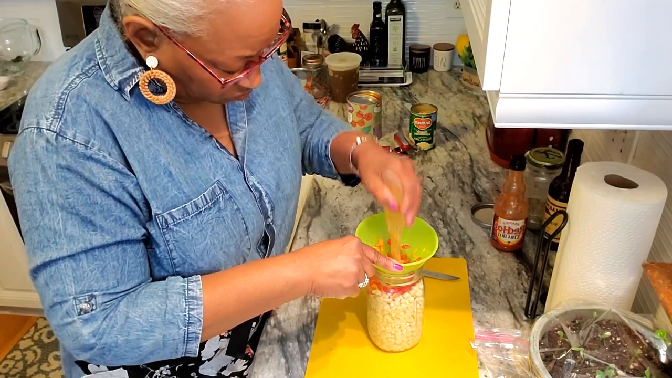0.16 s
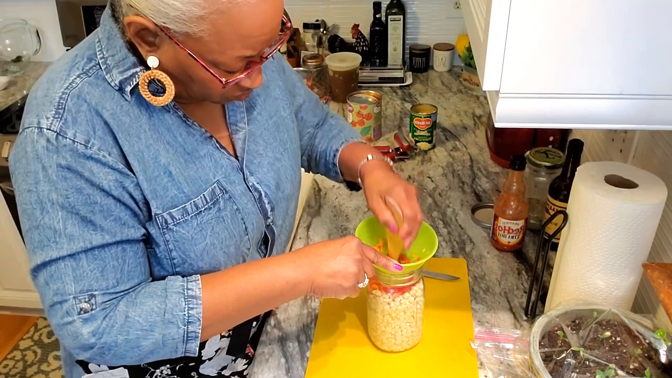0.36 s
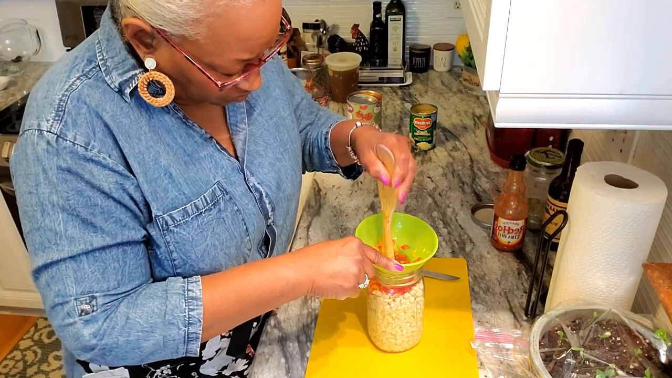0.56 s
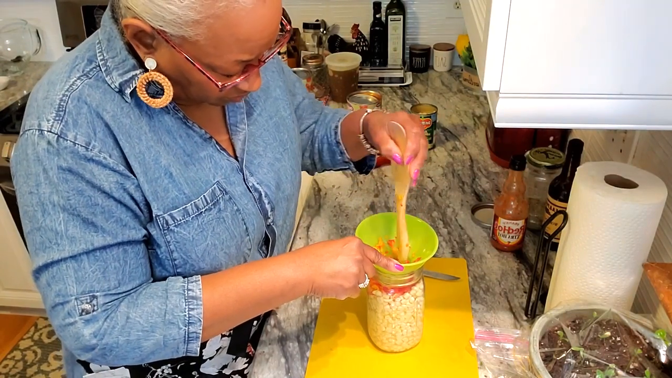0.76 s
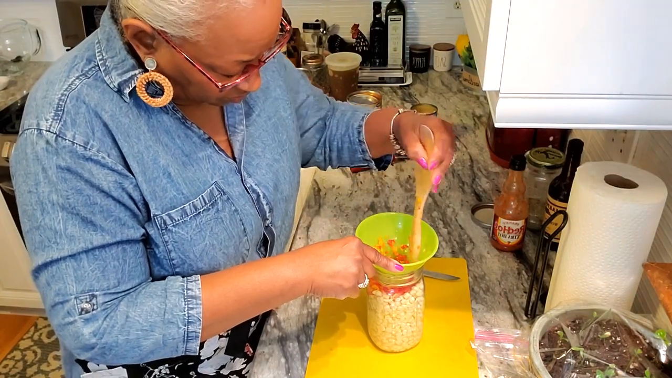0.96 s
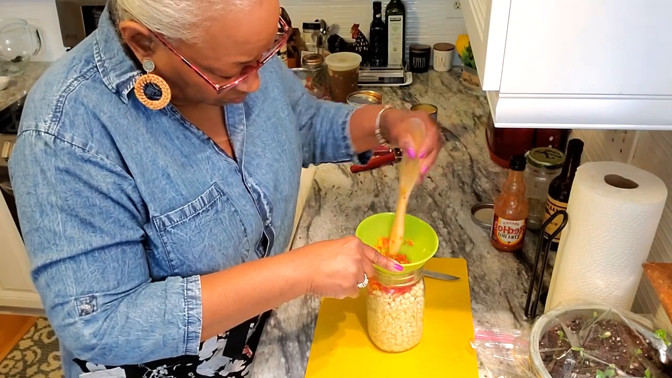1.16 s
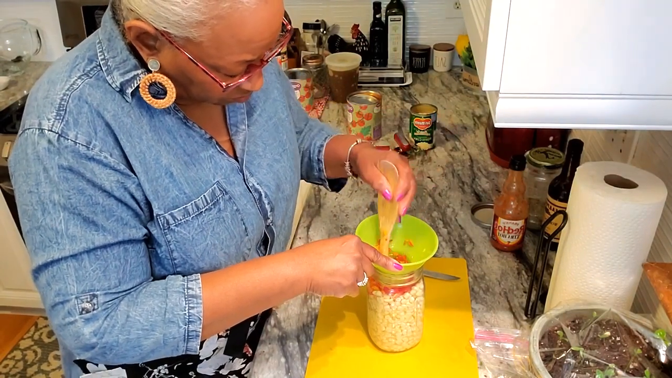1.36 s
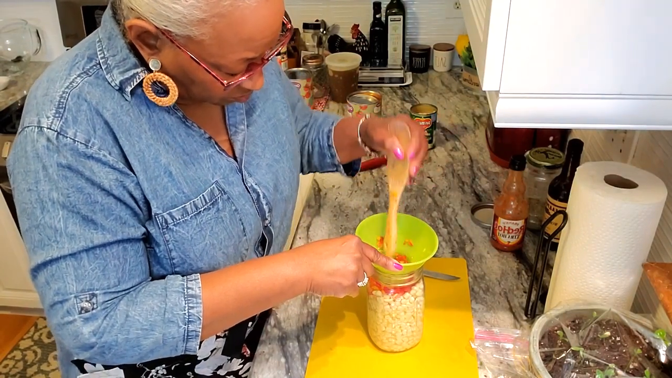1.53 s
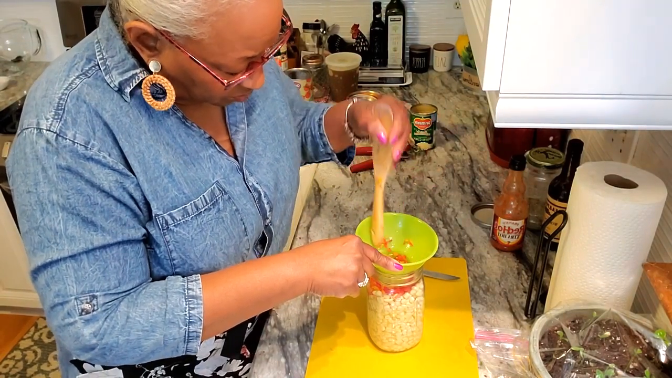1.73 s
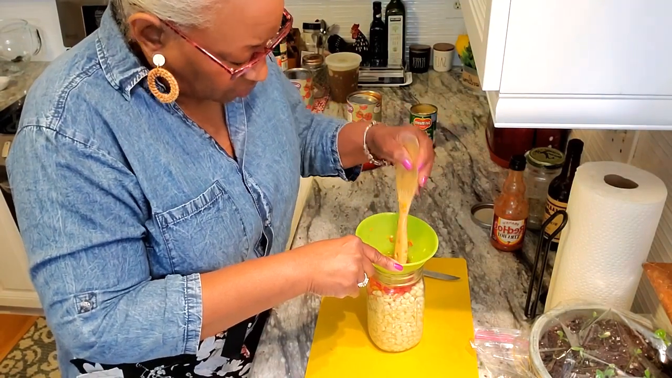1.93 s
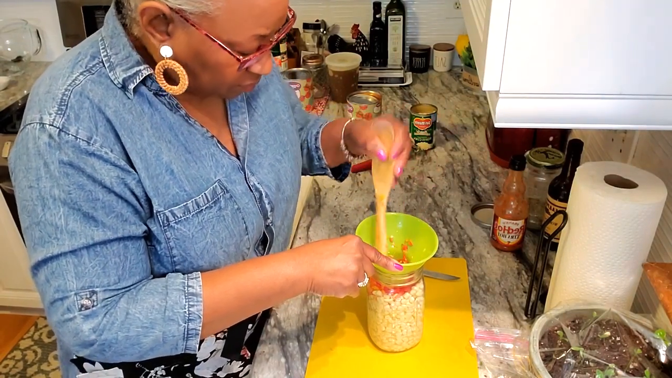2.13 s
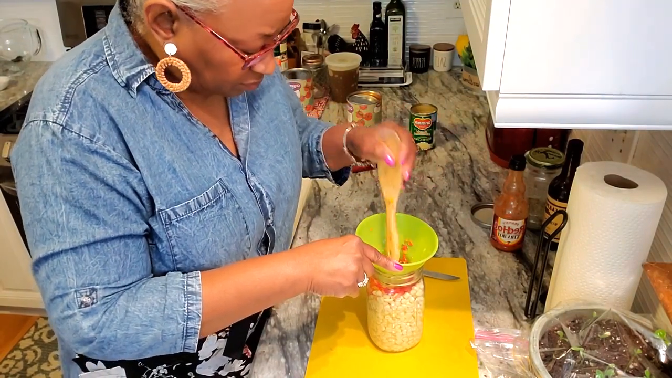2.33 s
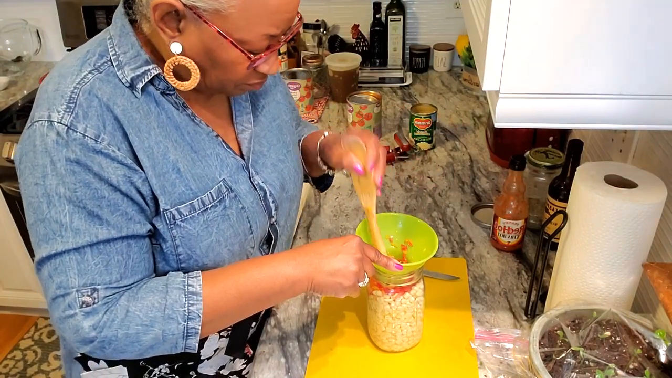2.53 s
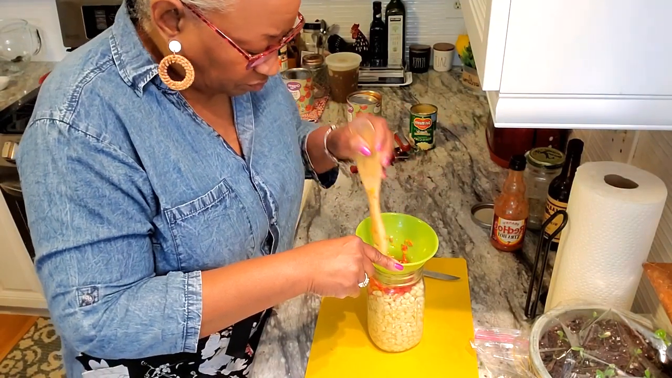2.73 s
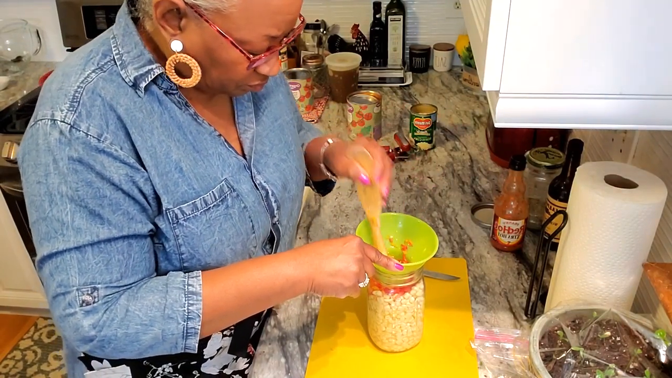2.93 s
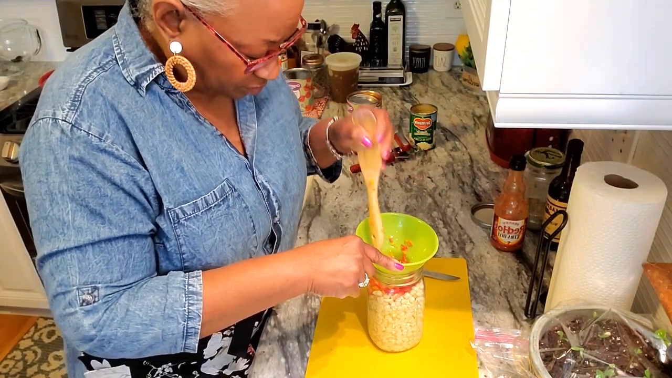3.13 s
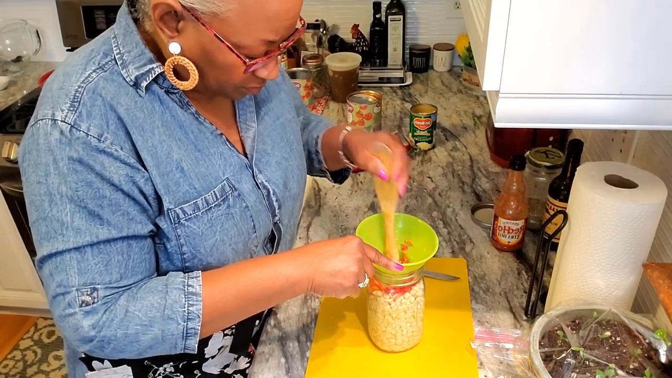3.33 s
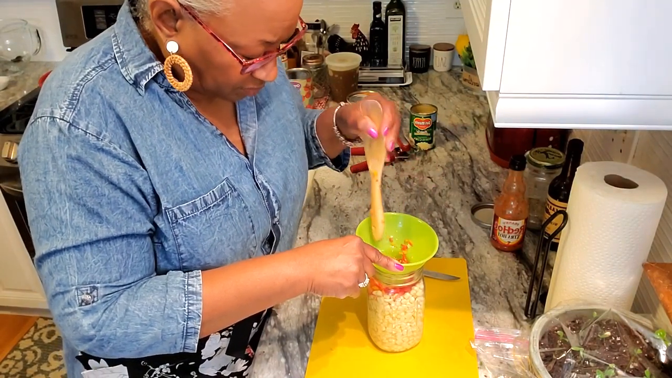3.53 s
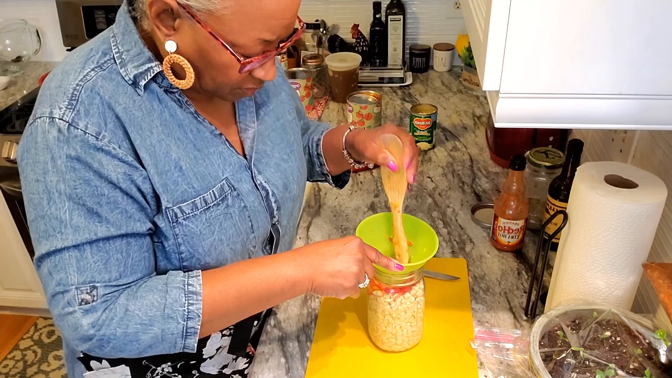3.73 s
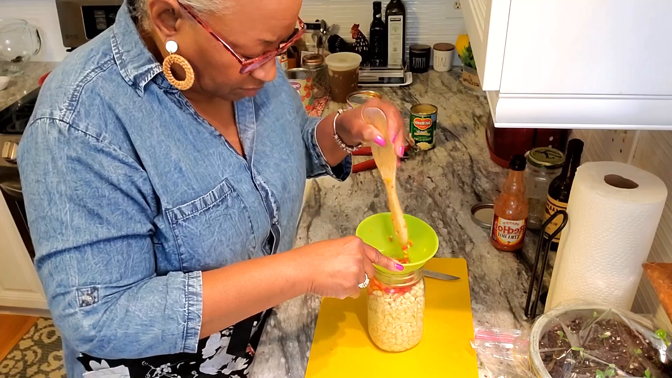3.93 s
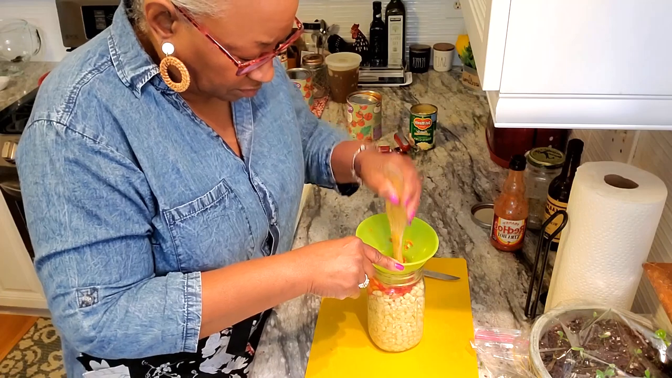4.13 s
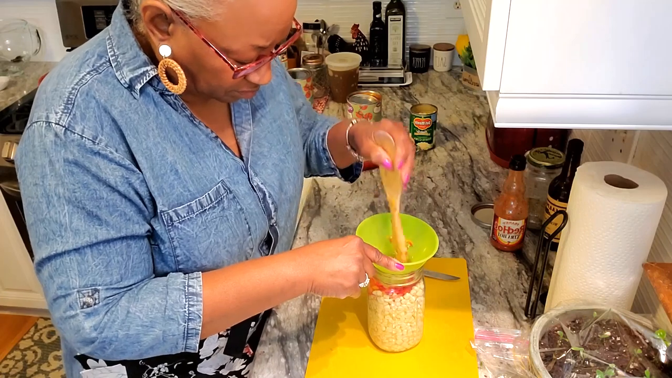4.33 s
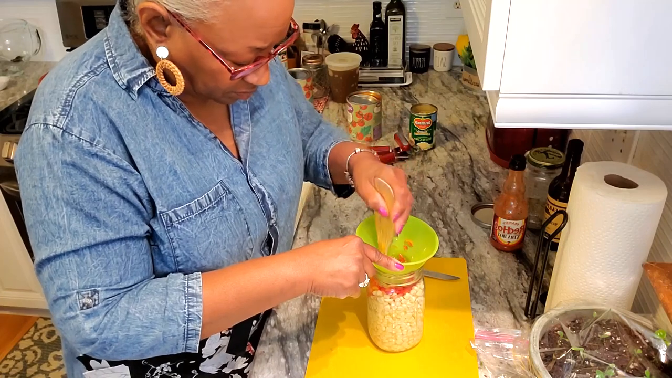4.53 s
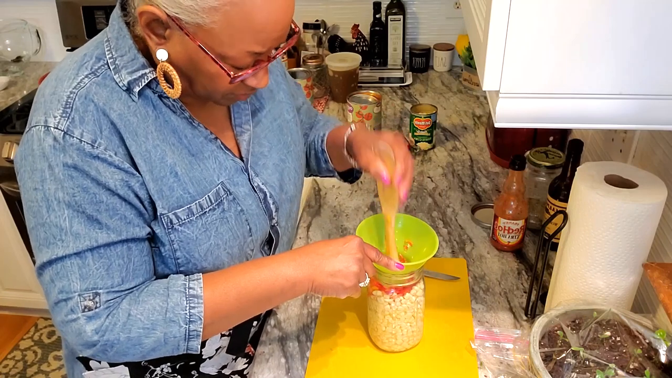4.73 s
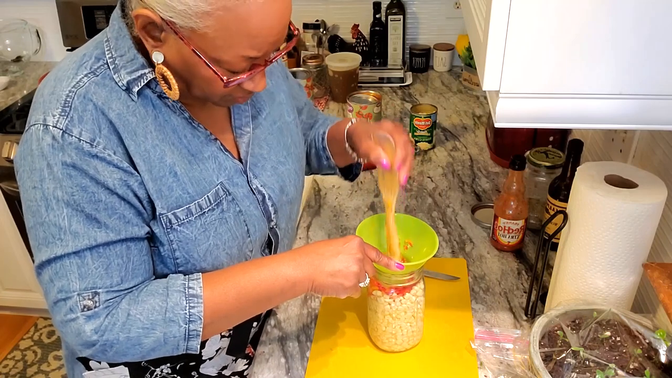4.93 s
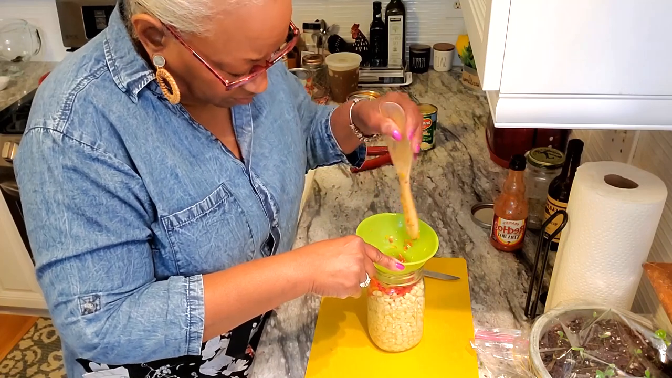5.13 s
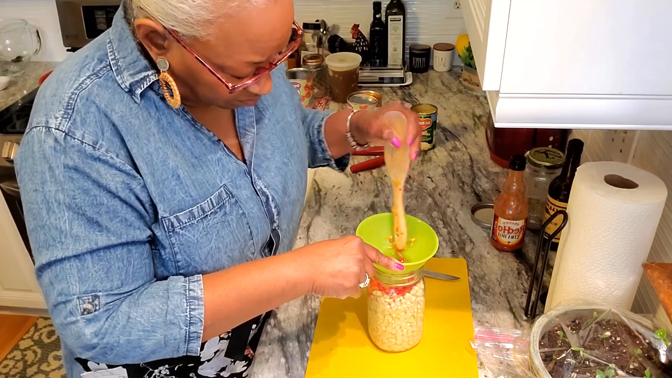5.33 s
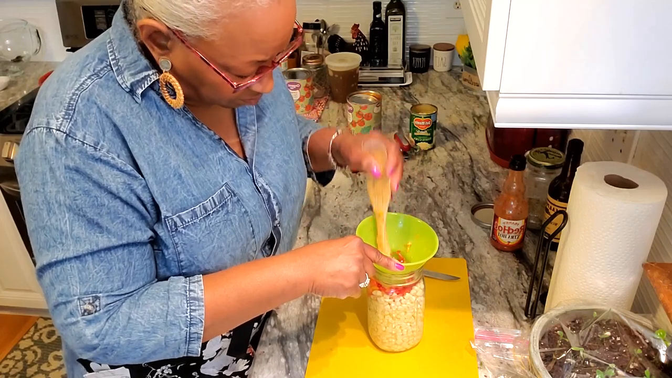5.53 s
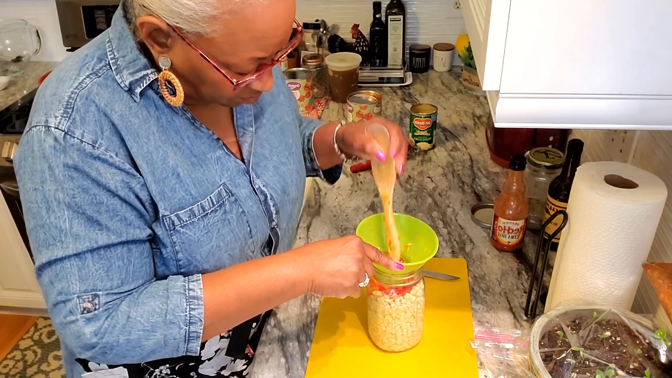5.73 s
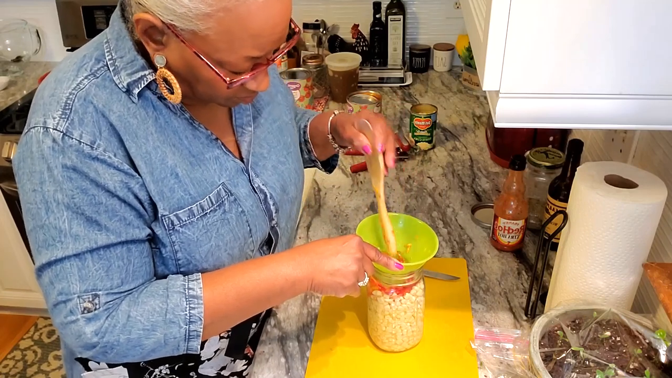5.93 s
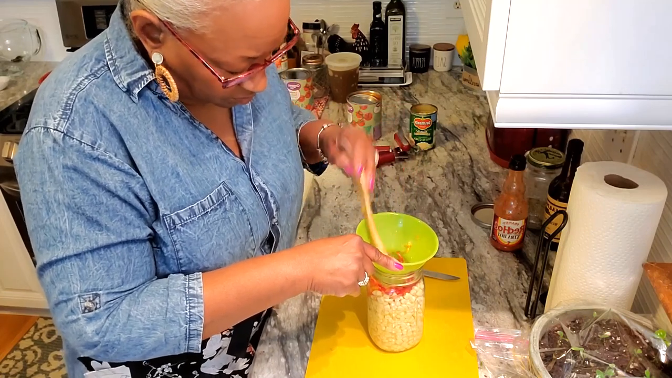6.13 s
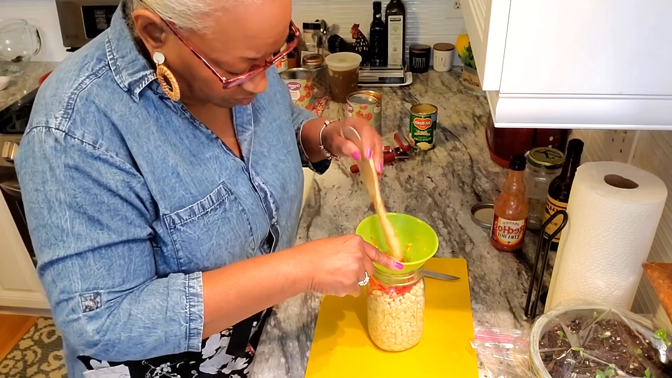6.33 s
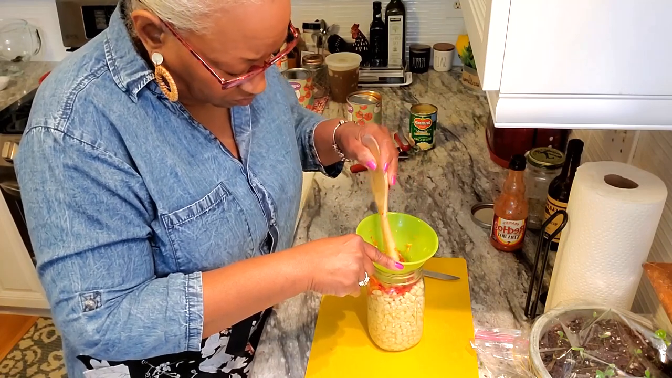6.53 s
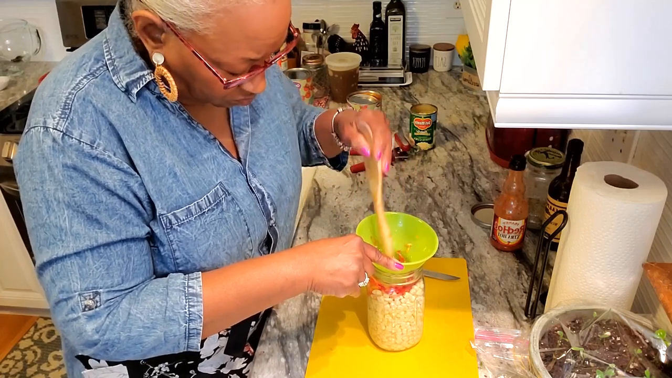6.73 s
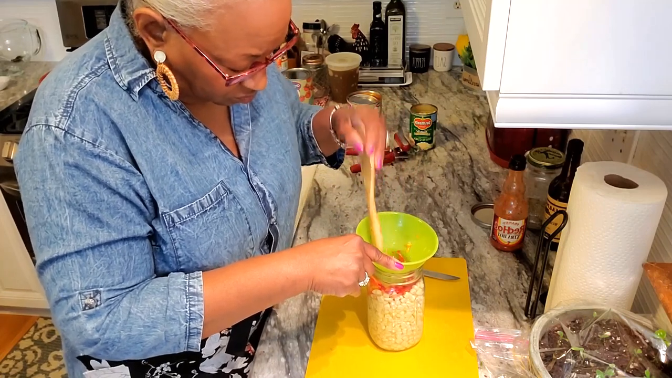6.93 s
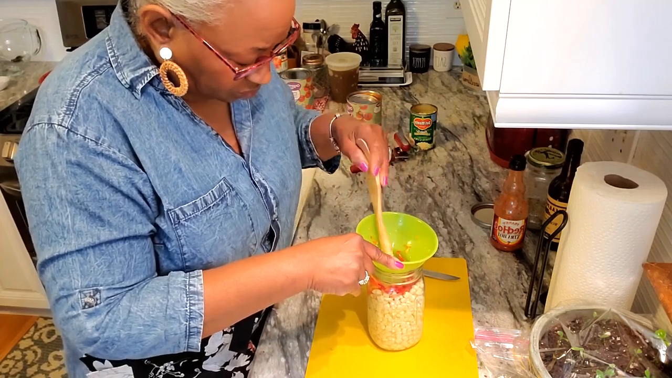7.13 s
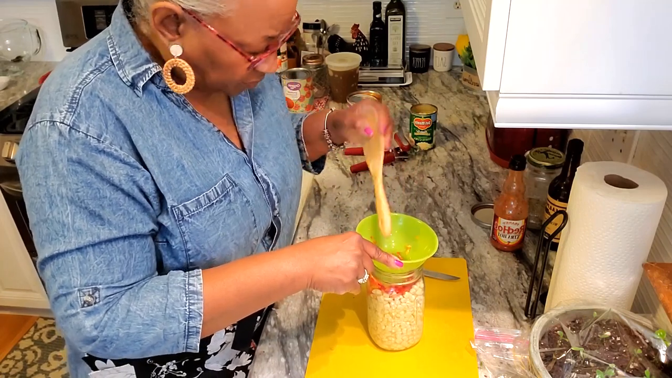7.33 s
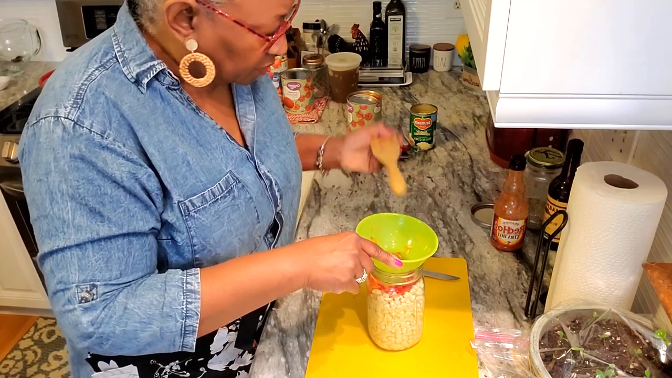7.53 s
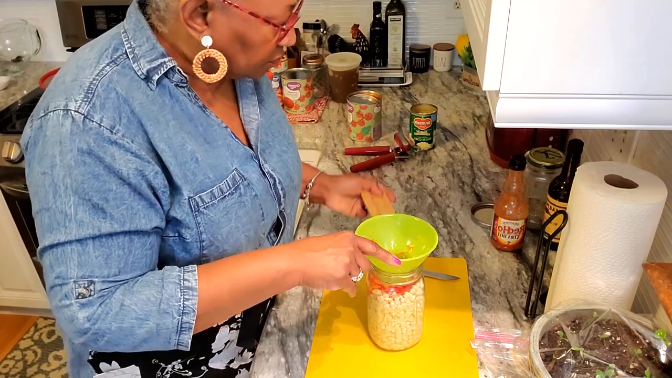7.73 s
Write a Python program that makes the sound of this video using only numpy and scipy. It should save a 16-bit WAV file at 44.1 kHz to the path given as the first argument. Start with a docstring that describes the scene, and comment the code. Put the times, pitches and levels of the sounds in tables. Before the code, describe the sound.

Soft, uneven pokes of wood against thin plastic, mixed with gritty little slides and wet shifting of vegetable pieces, continue for several seconds. Then the spoon is knocked five times on the funnel's rim, sharp, hard and far louder, about four a second, before only quiet air remains. Heard close in stereo in a small kitchen with brief hard-surface echoes and low hum.

```python
"""Spoon, funnel and jar in a small kitchen

A wooden spoon pokes chopped vegetables through a plastic funnel held on a glass jar, knocks and scrapes
its wall, then is rapped five times on the rim to shake it clean. Blows are noise cracks and decaying modes,
with a low thump of the jar on its board; scrapes and rustle are showers of tiny slips.
The stereo microphone hears them direct and off the kitchen walls, with quiet air and appliance hum behind.
"""
import sys
import numpy as np
from scipy import signal
from scipy.fft import rfft, irfft, next_fast_len
from scipy.io import wavfile
from scipy.ndimage import uniform_filter1d

SR = 44100
rng = np.random.default_rng(int(sys.argv[2]) if len(sys.argv) > 2 else 0)


def dump_mix(stems):
    """Bounce the given channels to the path in sys.argv[1] as a 16-bit WAV at rate SR."""
    frames = np.atleast_2d(stems).T  # one column per channel
    limited = np.clip(frames, -1, 1)  # hard clip at full scale
    pcm = np.round(limited * 32767).astype(np.int16)
    wavfile.write(sys.argv[1], SR, pcm)


N = 342657
BLOW_S, STRIKE_S = 0.2, 0.04  # rendered length of a blow; span over which its level is reckoned
WALL_PATHS = 3  # separate waves sent towards the kitchen walls
ROWS = 2 + WALL_PATHS  # left, right, then the wall paths

# spoon pushed down into the funnel; hardness is low on vegetables, high on bare plastic:
# start_s, force_db (relative), hardness_db (relative), wall_pitch_hz, clack_pitch_hz
POKES = [(0.951, -55.5, -18.5, 850, 5740), (1.292, -66, -4, 1320, 3800), (1.796, -62, -16, 825, 5060),
         (2.1452, -39.5, 1.5, 964, 5540), (2.5364, -68, 15.5, 1220, 5400), (2.5866, -50, 1, 940, 2650),
         (2.8779, -43.5, 0.5, 1064, 2930), (2.971, -52.5, 0, 1280, 2870), (3.2507, -43, -0.5, 850, 2360),
         (3.6375, -47.5, 0.5, 1350, 5040), (4.0607, -40, -4, 980, 3600), (4.145, -55.5, 3.5, 570, 3040),
         (4.4825, -43, 11, 1420, 2790), (4.6778, -71, 15.5, 1520, 4230), (5.249, -68.5, -10, 1030, 5200),
         (5.9014, -64, 4, 570, 3140)]
# clacking modes of spoon and funnel: pitch_hz, level_db (relative), t60_s
CLACK_MODES = [(2358, 2, 0.012), (3072, -2, 0.032), (2950, -15, 0.029), (3618, -4.5, 0.057),
               (3697, 4, 0.022), (3948, -6.5, 0.03), (4293, -4.5, 0.11), (4630, -8, .045),
               (5027, -9, 0.066)]
# bright modes of the funnel's edge: pitch_hz, level_db (relative), t60_s
EDGE_MODES = [(4670, -15, 0.12), (5000, -11.5, 0.0078), (5410, -5, .02), (5485, 2.5, .025),
              (5800, -3, 0.021), (5780, -5, 0.05), (5906, -2.5, 0.031), (5820, -5.5, 0.072),
              (6344, -12.5, 0.013), (7520, -8.5, 0.042), (8140, -9, 0.039), (8730, -26, .02)]


def blows():
    """Pokes into the funnel, dull or sharp by what they land on, then the raps on its rim."""
    # spoon rapped clean on the rim: start_s, force_db (relative), wall_pitch_hz, clack_pitch_hz
    raps = [(6.1901, -27, 1937, 4510), (6.4222, -28.5, 2010, 3300), (6.675, -30.5, 1960, 4080),
            (6.8837, -29.5, 1455, 4730), (7.1405, -27, 1373, 3750)]
    # how force is shared out, one level_db each: board thud, low body, wall knock, clack, bright edge
    poke_mix_db = np.array([-15, -6.5, -1.76, 2.5, -4])
    rap_mix_db = np.array([-9.5, -11, -5, 5.5, 2])
    # harder contact moves sound from low parts to high, same order: tilt (dB per dB of hardness)
    hardness_tilt = np.array([-0.33, -0.52, -0.018, 0.77, 1])
    out = np.zeros((ROWS, N))
    for start_s, force_db, hardness_db, wall_hz, clack_hz in POKES:
        parts_db = force_db + poke_mix_db + hardness_db * hardness_tilt
        add(out, start_s, blow(parts_db, -23, wall_hz, clack_hz))
    for start_s, force_db, wall_hz, clack_hz in raps:
        add(out, start_s, blow(force_db + rap_mix_db, -18.5, wall_hz, clack_hz))
    return out


def blow(parts_db, fizz_db, wall_hz, clack_hz):
    """One blow: a crack at the contact, the ring of spoon and funnel, and a slower thud of the jar on the board."""
    # board under the jar: pitch_hz, level_db (relative), t60_s
    board_modes = [(62, 0, 0.19), (86.1, 0.5, 0.26), (119, 8.5, 0.075), (175.4, -3, 0.16)]
    # low modes: two long standing waves of the room, then the hollow body of jar and funnel:
    # pitch_hz, level_db (relative), t60_s
    body_modes = [(221, -11.5, 0.3), (249.5, -9, 0.26), (293, -3.5, 0.08), (405.2, -6.5, 0.092),
                  (502.8, 1, 0.071), (593, 7, 0.045), (687.5, 6.5, 0.043)]
    # funnel wall: pitch_hz, level_db (relative), t60_s
    wall_modes = [(780, -3, 0.028), (1080, 1.5, 0.02), (1214, 2, 0.11), (1394, 11, 0.047),
                  (1600, -12, 0.031), (1924, 14, 0.034)]
    # the funnel's mouth aims the contact tones at the microphone, less at the walls
    upward = np.array([1, 1] + [0.45] * WALL_PATHS)[:, None]

    thud = band(ring(board_modes, scatter_db=0.5, alike=0.91, contact_s=0.0046), 38, 400)
    body = ring(body_modes, scatter_db=0.94, alike=0.54, contact_s=0.0016)

    # the patch of wall under the spoon, and the spoon itself, sound at pitches that depend on the spot
    patch = ring([(wall_hz, 0, 0.018)], scatter_db=0, alike=0.9, contact_s=0.0004)
    spoon = ring([(clack_hz, 0, 0.007)], scatter_db=0, alike=0.5, contact_s=0.0004)

    wall = 1.24 * upward * patch
    wall = wall + 0.48 * ring(wall_modes, scatter_db=1.5, alike=0.46, contact_s=0.0011)
    wall = wall + 0.76 * crack(590, 2500, fade_s=0.0025, alike=0.56)

    clack = crack(2860, 5260, fade_s=0.0009, alike=0.2) + 0.95 * upward * spoon
    clack = clack + 0.6 * ring(CLACK_MODES, scatter_db=3.5, alike=0.1, contact_s=0.00016)

    edge = crack(4420, 6570, fade_s=0.0028, alike=0.35)
    edge = edge + 0.3 * crack(6500, 9500, fade_s=0.0053, alike=1.0)
    edge = edge + 0.69 * ring(EDGE_MODES, scatter_db=5.0, alike=0.12, contact_s=0.00073)
    # a faint airy hiss above 9.5 kHz with each blow
    fizz = from_db(fizz_db) * crack(9500, 15900, fade_s=0.012, alike=0.2)

    parts = thud, body, strike_one(wall), strike_one(clack), strike_one(edge + fizz)
    return sum(gain * part for gain, part in zip(from_db(parts_db), parts))


def ring(modes, scatter_db, alike, contact_s):
    """Decaying modes set off by one blow; grip and spot of contact shift their pitch and strength a little."""
    t = np.arange(int(BLOW_S * SR)) / SR
    hz, db, t60 = np.array(modes, float).T
    hz = hz * (1 + 0.006 * rng.standard_normal(len(hz)))
    shape = (ROWS, len(modes))
    strength = from_db(db + scatter_db * rng.standard_normal(shape))
    start_phase = np.exp(2j * np.pi * rng.random(shape))
    decays = np.exp(np.outer(2j * np.pi * hz - np.log(1000) / t60, t))
    waves = ((strength * start_phase) @ decays).imag
    onset = 1 - np.exp(-(t / contact_s) ** 2)  # a longer contact starts more softly
    return strike_one(radiate(waves * onset, alike))


def crack(low_hz, high_hz, fade_s, alike):
    """The dense, quickly damped modes of plastic at the moment of contact, as a burst of banded noise."""
    hold_s = 0.0008  # wood chatters on the plastic, then lets go
    t = np.arange(int(BLOW_S * SR)) / SR
    fade = np.exp(-np.maximum(t - hold_s, 0) / fade_s) * (1 - np.exp(-t / 0.0001))
    burst = rng.choice([-1, 1], (ROWS, len(t))) * (fade + 1e-12)
    return strike_one(radiate(band(burst, low_hz, high_hz, order=4), alike))


def strike_one(x):
    """Scales a blow so that its energy equals rms 1 over the length of a strike."""
    return x / np.sqrt(np.sum(x ** 2) / len(x) / (STRIKE_S * SR))


def scrapes(level_db):
    """Each slide along the wet wall, and the drag through the pieces after each poke, swells and fades."""
    # spoon sliding along the wall: middle_s, half_length_s, level_db (relative), centre_hz
    slides = [(0.211, 0.012, -39, 5000), (0.22, 0.049, -56, 3850), (0.253, 0.046, -58.5, 1180),
              (1.239, 0.13, -64.5, 3700), (1.794, 0.0049, -49, 7750), (1.922, 0.087, -66, 5200),
              (4.17, 0.027, -40.5, 4540), (4.845, .042, -57, 6100), (5.596, 0.04, -61, 4350),
              (5.602, .03, -63.5, 420), (6.19, 0.012, -23, 4180)]
    out = np.zeros((ROWS, N))
    t = np.arange(-SR // 6, SR // 6) / SR
    usual_db = np.mean(POKES, axis=0)[1]
    drags = []
    for start_s, force_db, *_ in POKES:
        drag_db = -71 + 0.78 * (force_db - usual_db)  # a little louder after a firmer poke
        drags.append((start_s + 0.1, 0.055, drag_db, 5400))
    for middle_s, half_s, db, centre_hz in slides + drags:
        per_s = 24 / half_s  # slow strokes break up into separate slips
        swell = np.exp(-(t / half_s) ** 2)
        stroke = slips(swell, per_s, centre_hz, octaves=0.64)
        add(out, middle_s + t[0], from_db(db + level_db) * stroke)
    return out


def rustle(clump_db):
    """Wet pieces shift in the funnel in small uneven clumps, heard as slips of wandering strength."""
    # rustle between the strokes: time_s, level_db (relative; its swings are widened below)
    curve = [(0.02, -73), (0.41, -70.5), (0.89, -80.5), (1.25, -70), (1.7, -73), (2.08, -69.5),
             (2.64, -79.5), (4.5, -74.5), (4.66, -76), (5.01, -73), (5.38, -70), (6.05, -77)]
    s, db = np.transpose(curve)
    swing_db = 2.8 * np.interp(np.arange(N) / SR, s, db - db.mean())
    strength = from_db(swing_db + clump_db * drift(23))
    return from_db(-85) * slips(strength, per_s=230, centre_hz=4640, octaves=0.95)


def slips(stroke, per_s, centre_hz, octaves, grit_db=0.5, ring_share=1.1, fizz_db=-12):
    """Tiny slips of wood on wet plastic follow a stroke's strength, coloured by the funnel's upper modes."""
    size = next_fast_len(len(stroke), real=True)
    hz = np.fft.rfftfreq(size, 1 / SR) + 1
    funnel = 1
    for mode_hz, _, t60 in CLACK_MODES + EDGE_MODES:
        funnel = funnel + ring_share / (1 + ((hz - mode_hz) * t60 / 2) ** 2)
    colour = funnel / np.sqrt(1 + (np.log2(hz / centre_hz) / octaves) ** 6)
    # a faint fizz above 10 kHz, stronger for brighter strokes
    colour = colour + from_db(fizz_db) * (hz > 10000) * (centre_hz / 5000) ** 2
    grit = from_db(grit_db * np.clip(rng.standard_normal(size), -2, 2))
    clicks = (rng.random(size) < per_s / SR) * grit
    clicks = clicks * np.pad(stroke, (0, size - len(stroke))) * rng.choice([-1, 1], (ROWS, size))
    sound = radiate(from_spectrum(clicks, colour)[:, :len(stroke)], 0.93)
    return np.sqrt(np.mean(stroke ** 2)) * sound


def radiate(waves, alike):
    """The funnel sends a different wave each way: rows are left, right, then one for each path to the walls."""
    mid, side, *to_walls = waves / np.sqrt(np.mean(waves ** 2, axis=1, keepdims=True) + 1e-20)
    return np.vstack([stereo(mid, side, alike), to_walls])


def kitchen(x, first_echo_s, early_t60_s, early_db):
    """Counter and cupboards answer within milliseconds; the rest of the room dies away band by band."""
    # decay of the room: centre_hz, t60_s
    room_t60 = [(100, 0.97), (260, 0.6), (700, 0.43), (1840, 0.51), (4850, 0.45), (9000, 0.33)]
    # left-right likeness of the echoes: frequency_hz, likeness (-1 to 1)
    room_likeness = [(80, .95), (250, .84), (600, .66), (1400, .4), (2500, .3), (4000, -.05), (12000, 0)]
    # reflected against direct sound: frequency_hz, level_db
    reflected = [(100, -9), (260, 7), (700, 2.5), (1840, 0), (4000, -5), (6000, -1.5), (9000, -5.5),
                 (13000, 8)]
    size, out = SR // 2, x[:2]
    t = np.arange(size) / SR - first_echo_s
    hz = np.fft.rfftfreq(size, 1 / SR) + 1
    centres, t60s = np.transpose(room_t60)
    for path in x[2:]:
        echoes, response = noise(hz, room_likeness), 0
        for pick, t60 in zip(np.eye(len(centres)), t60s):
            share = np.interp(np.log(hz), np.log(centres), pick)
            fade = from_db(-60 * t / t60) + from_db(early_db - 60 * t / early_t60_s)
            response = response + (t > 0) * fade * irfft(echoes * share, size)
        # the response is evened out, then given the room's colour
        mean_power = np.mean(np.abs(rfft(response)) ** 2, axis=0)
        power = WALL_PATHS * uniform_filter1d(mean_power, size=61)
        response = from_spectrum(response, from_db(at_hz(reflected, hz)) / np.sqrt(power))
        response = response[:, :size * 4 // 5]
        out = out + signal.oaconvolve(path[None], response, axes=1)[:, :N]
    return out


def dull_top(x, corner_hz, leak_db):
    """The handling sound is cut steeply above the corner, with a faint band let through."""
    low = signal.sosfilt(signal.butter(14, corner_hz, fs=SR, output="sos"), x + 1e-18)
    return low + from_db(leak_db) * band(x, 11500, 15000)


def background(air_db, waver_db, hum_waver_db):
    """Soft rumble and hiss of the room as shaped noise, with the wavering sine tones of appliances."""
    # colour of the air: frequency_hz, level_db (per Hz, relative)
    air_colour = [(20, -26), (38, -11), (52, -0.5), (90, 0.5), (145, -11.5), (255, -10), (370, -16),
                  (640, -19.5), (950, -27.5), (1400, -29), (1900, -24), (2900, -27.5), (3600, -24),
                  (4400, -28), (5700, -25.5), (8500, -42), (10000, -48.5), (15500, -43.5)]
    # left-right likeness of the air: frequency_hz, likeness (-1 to 1)
    air_likeness = [(60, 1), (250, 0.67), (700, 0.32), (2000, 0.14), (6000, 0.21), (14000, 0.089)]
    # appliance hum and whine: pitch_hz, level_db (before wavering)
    hum_lines = [(59.2, -79.5), (85, -81), (166.9, -85.5), (247.6, -76), (296.1, -81), (467, -83.5),
                 (532.9, -81), (2420, -86), (3500, -90.5), (3950, -89.5)]
    t, size = np.arange(N) / SR, next_fast_len(N)
    hz = np.fft.rfftfreq(size, 1 / SR) + 1
    spectrum = noise(hz, air_likeness) * from_db(at_hz(air_colour, hz))
    air = rms_one(irfft(spectrum, size)[:, :N])
    hum = 0
    for line_hz, db in hum_lines:
        level = np.sqrt(2) * from_db(db + hum_waver_db * drift(6.1))
        hum = hum + level * np.sin(2 * np.pi * line_hz * t + 0.52 * drift(3.5))
    return from_db(air_db + waver_db * drift(3.1)) * air + hum


def noise(hz, likeness):
    """Spectrum of stereo white noise with a left-right likeness for each frequency."""
    mid, side = rng.standard_normal((2, len(hz))) + 1j * rng.standard_normal((2, len(hz)))
    return stereo(mid, side, at_hz(likeness, hz))


def stereo(mid, side, alike):
    """Left and right with the given likeness."""
    alike = np.clip(alike, -1, 1)
    return np.sqrt((1 + alike) / 2) * mid + np.sqrt((1 - alike) / 2) * side * np.array([[1], [-1]])


def drift(rate):
    """Smooth chance of rms 1, with the given number of knots a second."""
    knots = rng.standard_normal(int(N / SR * rate) + 2)
    return rms_one(np.interp(np.arange(N) / SR * rate, np.arange(len(knots)), knots))


def band(x, low_hz, high_hz, order=2):
    """Causal band-pass."""
    sos = signal.butter(order, [low_hz, min(high_hz, 0.48 * SR)], "band", fs=SR, output="sos")
    return signal.sosfilt(sos, x)


def from_spectrum(x, gain):
    """Filters a stretch of sound by a gain for each frequency."""
    return irfft(rfft(x) * gain, x.shape[-1])


def at_hz(points, hz):
    """Reads a curve of (Hz, value) points on a logarithmic frequency scale."""
    point_hz, values = np.transpose(points)
    return np.interp(np.log(hz), np.log(point_hz), values)


def from_db(db):
    """Amplitude from decibels."""
    return 10 ** (np.asarray(db) / 20)


def rms_one(x):
    """Scales to rms 1."""
    return x / np.sqrt(np.mean(x ** 2) + 1e-20)


def add(out, s, sound):
    """Mixes a sound in from the given time."""
    start = max(int(s * SR), 0)
    out[:, start:start + sound.shape[1]] += sound[:, :max(N - start, 0)]


def scene():
    """Spoon and funnel sound through the kitchen, over its quiet background."""
    handling = blows() + scrapes(level_db=-2.5) + rustle(clump_db=4.5)
    heard = kitchen(handling, first_echo_s=0.0021, early_t60_s=0.11, early_db=12.0)
    rounded = 1.05 * np.tanh(heard / 1.05)  # the microphone rounds the hardest raps
    close = dull_top(rounded, corner_hz=8490, leak_db=-20.0)
    return close + background(air_db=-62.5, waver_db=0.64, hum_waver_db=2.5)


def record(dry):
    """The deepest rumble and the top are cut."""
    audible = signal.sosfilt(signal.butter(2, 33, "high", fs=SR, output="sos"), dry)
    return signal.sosfilt(signal.ellip(10, 0.2, 70, 15850, fs=SR, output="sos"), audible)


dry = scene()
out = record(dry)
dump_mix(out)
```